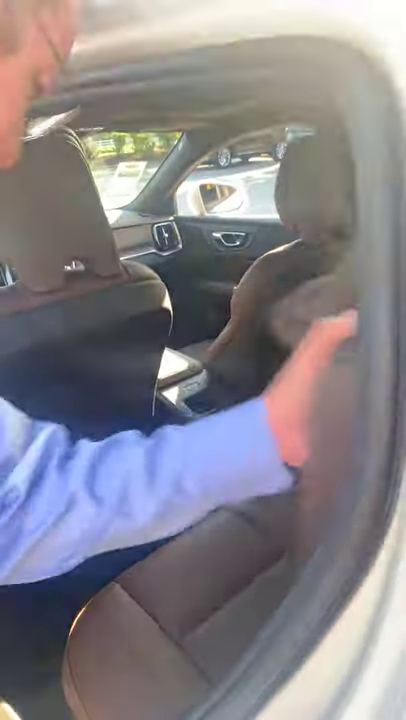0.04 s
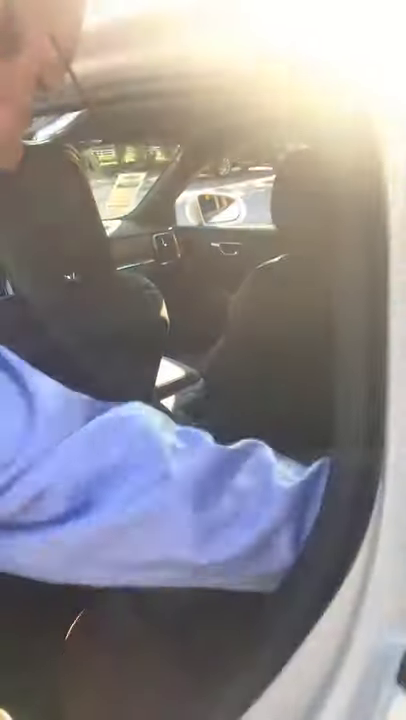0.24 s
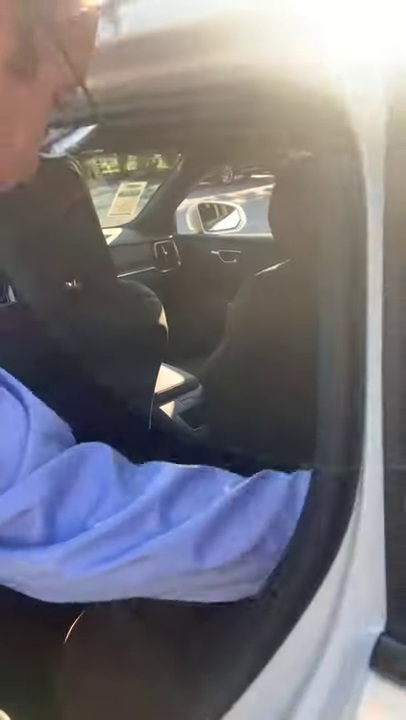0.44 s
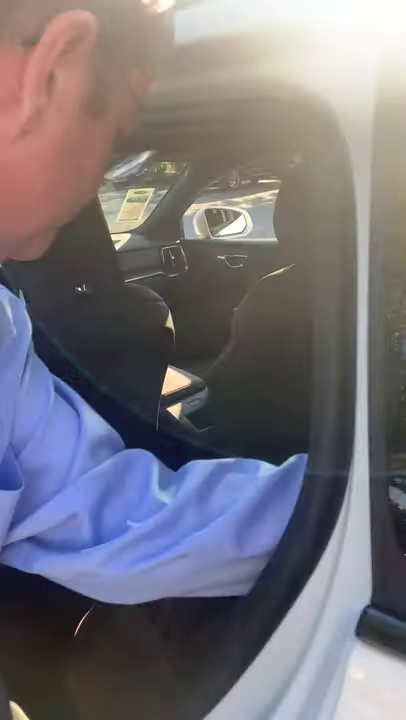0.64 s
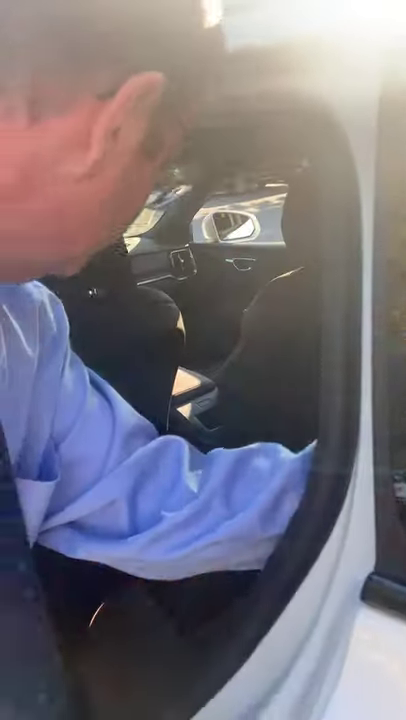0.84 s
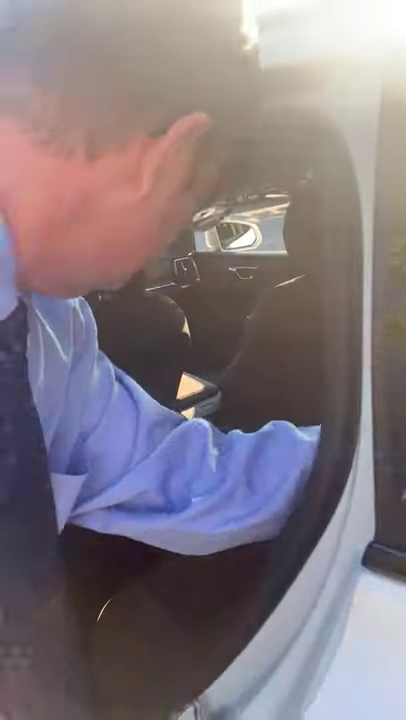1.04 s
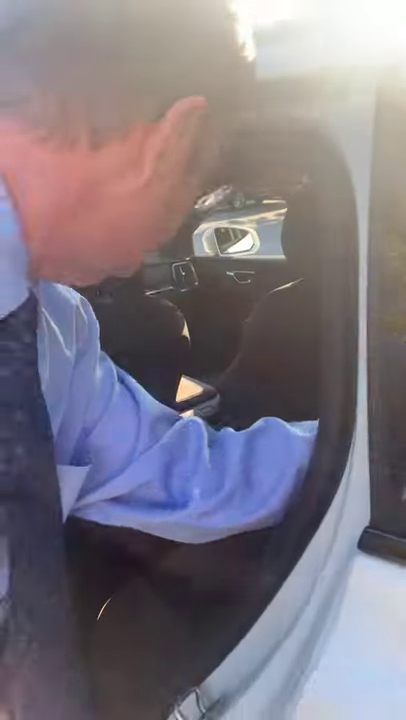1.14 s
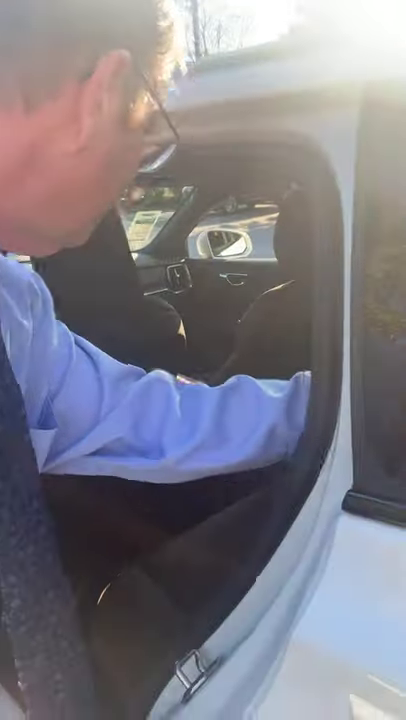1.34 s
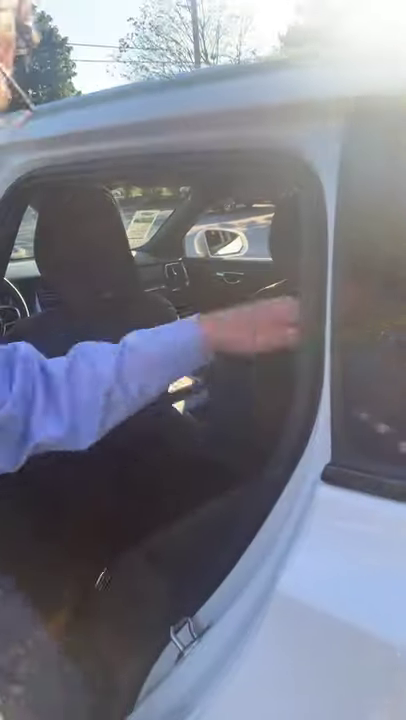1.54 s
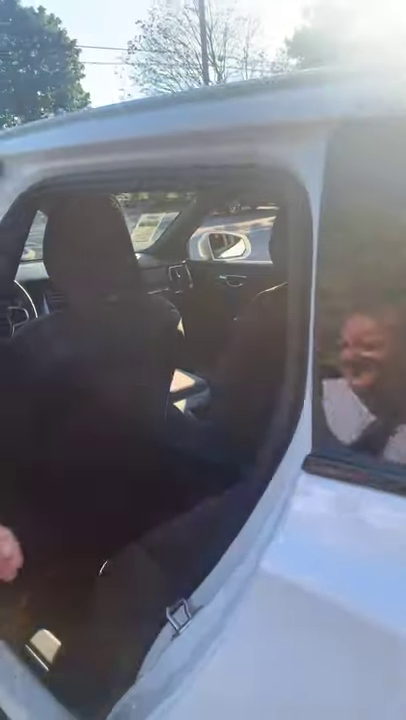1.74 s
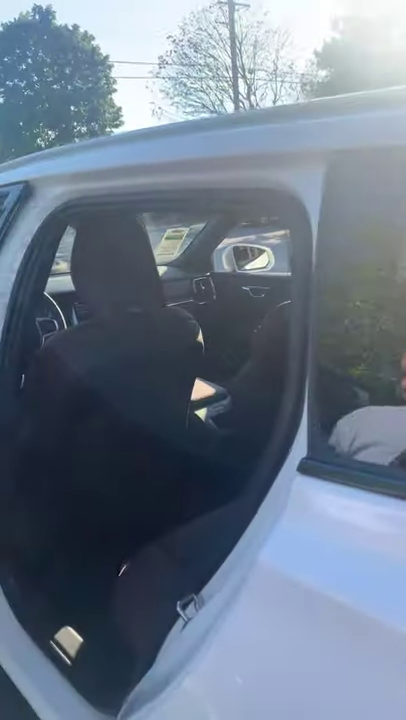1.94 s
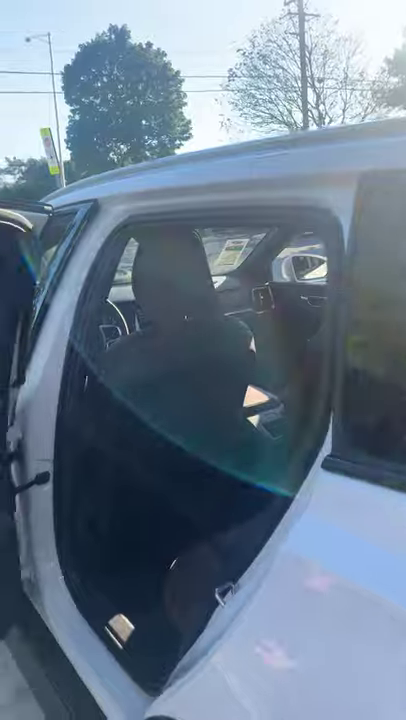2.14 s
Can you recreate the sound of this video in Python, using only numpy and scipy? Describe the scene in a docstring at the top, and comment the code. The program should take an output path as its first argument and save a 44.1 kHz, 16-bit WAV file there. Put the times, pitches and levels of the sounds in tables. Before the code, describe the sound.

A car's rear seat back slams into its latch with a loud thud and brief metallic ring. A softer knock follows, then light sleeve brushes, heard close at the open door over faint engine idle, wind and traffic.

```python
"""A hard slam and a short metallic ring: a car's rear seat back swings upright into its latch,
heard from the open door. The blows shake the panels and frame, the cabin air booms, and the seat
rebounds on its padding; later it is pushed home with a softer knock. Upholstery slides and a sleeve
brushes the trim, over a bed of idling engine, wind and far traffic."""
import sys
import numpy as np
from scipy import signal
from scipy.fft import rfft, irfft, next_fast_len
from scipy.io import wavfile
from scipy.ndimage import uniform_filter1d, minimum_filter1d, map_coordinates

SR = 44100
rng = np.random.default_rng(int(sys.argv[2]) if len(sys.argv) > 2 else 0)


def unload_audio(sound):
    """Save the sound as a 16-bit wav file, at the path given as the first command line argument."""
    columns = np.transpose(np.atleast_2d(sound))
    # keep every value between -1 and 1, then stretch to whole-number steps
    steps = np.round(np.clip(columns, -1, 1) * 32767)
    wavfile.write(sys.argv[1], SR, steps.astype(np.int16))


N = 97020
TIME = np.arange(N) / SR


def slam():
    """The frame hits its stop in a burst of contacts: it rings, panels shake, metal cracks, the pawl snaps."""
    # frame hitting stop and latch (time [s], relative panel level [dB], crack level [dB])
    strikes = [(0.2054, -11.5, -31.5), (0.2094, -7.5, -26.5), (.2183, -20.5, -22.5), (0.225, -20, -25),
               (0.2319, -10, -22), (0.2415, -10, -26), (0.2478, -25, -27.5)]
    # ringing modes of the seat frame (frequency [Hz], relative level [dB], t60 [s])
    frame_modes = [(121.3, -16, 0.13), (214, -10, .2), (295, -3.5, 0.092), (325, -0.5, 0.055),
                   (407, -11, 0.3), (462.8, -5, 0.066), (562.7, -12, 0.16), (660, -20.5, 0.39),
                   (736.5, -14, 0.35), (881, -22, 0.16), (1016, -10, 0.038), (1093, -9, 0.055),
                   (1682, -26, 0.13), (2540, -35, 0.082)]
    # body of the shaken panels (frequency [Hz], relative level [dB])
    panel_colour = [(40, -34), (110, -20), (200, -12.5), (330, 3), (600, -4), (1200, -9), (1600, -14),
                    (3000, -24.5), (6000, -47), (15000, -67)]
    # bite of metal on metal (frequency [Hz], relative level [dB])
    crack_colour = [(300, -38), (1100, -5.5), (2300, -1.5), (3800, -6.5), (5500, -17.5), (7200, -27),
                    (8300, -25.5), (15000, -53)]
    # latch pawl snapping shut (time [s], level [dB])
    snaps = [(.2275, -25), (0.2317, -24), (.2343, -20.5), (0.2433, -32)]
    # bright click of the pawl (frequency [Hz], relative level [dB])
    pawl_colour = [(500, -35), (3400, 0), (6000, -4), (8500, -11), (15000, -22)]
    frame_db, frame_attack_s, frame_hold_s = -13.5, 0.0036, 0.038
    panel_db = -2.5
    plate_s, plate_hz, plate_db = 0.2118, 1162, -6

    age = np.maximum(TIME - strikes[0][0], 0)
    release = np.maximum(age - frame_hold_s, 0)  # the ring sustains through the burst, then decays
    ring = sum(amp(db) * np.exp(-np.log(1000) * release / t60) * np.sin(2 * np.pi * hz * age)
               for hz, db, t60 in frame_modes)
    out = amp(frame_db) * (1 - np.exp(-age / frame_attack_s)) * ring
    for start, db, crack_db in strikes:
        out += amp(db + panel_db) * fade(start, t60=0.11) * noise(panel_colour)
        out += amp(crack_db) * fade(start, t60=0.053) * noise(crack_colour)
    catch_plate = np.sin(2 * np.pi * plate_hz * (TIME - plate_s))
    out += amp(plate_db) * fade(plate_s, t60=0.03) * catch_plate  # one pitched clack
    for start, db in snaps:
        out += amp(db) * fade(start, t60=0.0037, attack=0.0002) * noise(pawl_colour)
    return out


def thumps():
    """Each padded contact is one low pressure pulse with a dull rattle of trim."""
    # seat bumping its catch (time [s], pulse level [dB], pulse pitch [Hz], rattle level [dB])
    bumps = [(0.2669, -7.5, 352, -30), (.2828, -15, 600, -20.5), (0.2868, -6.5, 314, -23),
             (0.3034, -20.5, 210, -27), (.3300, -22, 450, -33), (0.342, -10.5, 274, -23.5),
             (0.3854, -28, 204, -38), (1.0570, -17, 360, -22.5), (1.0686, -19, 300, -23.5),
             (1.08, -20.5, 260, -56), (1.0956, -19.5, 260, -31)]
    # dull rattle of the trim (frequency [Hz], relative level [dB])
    trim_colour = [(30, -27), (90, -6), (180, -1.5), (380, 0.5), (700, -8), (1400, -18.5), (3000, -34),
                   (7000, -51.5), (15000, -64)]
    out = np.zeros(N)
    for centre, pulse_db, hz, rattle_db in bumps:
        spread = (np.pi * hz * (TIME - centre)) ** 2
        pulse = (2 * spread - 1) * np.exp(-spread)
        rattle = fade(centre - 0.5 / hz, t60=0.11) * noise(trim_colour)
        out += amp(pulse_db) * pulse + amp(rattle_db) * rattle
    return out


def boom():
    """The cabin air and seat springs swell and fade, adding low weight to the slam and the knock."""
    # air and spring resonances (time [s], frequency [Hz], level [dB], rise [s], t60 [s])
    resonances = [(0.233, 28.5, -26.5, 0.019, 0.66), (0.239, 150, -17, 0.0064, 0.36),
                  (1.054, 79.5, -21, 0.0067, .16), (1.07, 157, -28, 0.012, 0.27)]
    return sum(amp(db) * fade(start, t60, rise) * np.sin(2 * np.pi * hz * (TIME - start))
               for start, hz, db, rise, t60 in resonances)


def cabin(sound):
    """The short, padded reverb of the cabin, its treble soaked up by the upholstery."""
    dull_noise = noise([(100, 0), (3500, 0), (15000, -10)])
    tail = (dull_noise * fade(0.0014, t60=0.35))[:SR // 2]
    return signal.fftconvolve(sound, tail / np.linalg.norm(tail))[:N]


def handling():
    """Upholstery slides with a fluttering hiss; sleeve and belt tap the trim in small noise bursts."""
    # upholstery sliding as the seat swings (time [s], level [dB])
    rustle = [(0, -62), (.06, -53.5), (.12, -59), (.19, -46), (.3, -70), (.45, -74)]
    # cloth friction (frequency [Hz], relative level [dB])
    cloth_colour = [(500, 18), (2000, 4), (5500, -2), (9000, -14), (15000, -18)]
    # sleeve and belt touching the trim (time [s], level [dB], centre [Hz], t60 [s])
    touches = [(1.0542, -36, 1310, .035), (1.0542, -46.5, 4800, 0.021), (1.515, -42.5, 54.7, 0.092),
               (1.52, -48, 5760, .02), (1.530, -57, 6000, .05), (1.562, -47, 4700, 0.021),
               (1.727, -52, 3350, 0.099), (1.758, -38, 416, 0.1)]
    out = amp(curves(rustle)[0] + 4.5 * wobble(38.3)) * noise(cloth_colour)
    for start, db, hz, t60 in touches:
        band = [(hz * 2.0 ** octave, -15 * octave ** 2) for octave in range(-4, 5)]
        out += amp(db) * fade(start, t60) * noise(band)
    return out


def engine():
    """An idling engine's low hum with two overtones, slightly unsteady in pitch and level."""
    # hum as the listener moves by the door (time [s], harmonic 1 [dB], harmonic 2 [dB], harmonic 3 [dB])
    harmonic_levels = [(0, -71, -47.5, -53), (.2, -56, -51, -43.5), (.5, -49, -54.5, -49.5),
                       (.62, -48.5, -56, -60), (.9, -48, -61, -53), (1.28, -44, -56, -49.5),
                       (1.52, -57.5, -57.5, -55.5), (1.8, -45.5, -63.5, -63), (2.2, -60, -69, -85)]
    hum_hz, waver = 87, 0.0077
    pitch = hum_hz * (1 + waver * wobble(8.09))
    phase = 2 * np.pi * np.cumsum(pitch) / SR
    return sum(np.sqrt(2) * amp(db + 0.4 * wobble(11.8)) * np.sin(harmonic * phase)
               for harmonic, db in enumerate(curves(harmonic_levels), 1))


def outdoors():
    """Wind rushes steadily while the tyre roar of far traffic grows."""
    # low rush of wind (frequency [Hz], relative level [dB])
    wind_colour = [(12, -46), (20, -27), (38, -4.5), (53, -32), (66, -17), (83, -2.5), (101, -18.5),
                   (116, -7.5), (161, -16.5), (232, -12), (259, -11.5), (505, -14.5), (932, -11.5),
                   (1160, -18.5), (1540, -21), (5850, -46.5), (15500, -57.5)]
    # distant tyre roar (frequency [Hz], relative level [dB])
    tyre_colour = [(100, -31), (300, -11), (420, -6.5), (600, -10.5), (780, -0.5), (910, 1), (1100, -4),
                   (1500, -7.5), (2600, -19), (5000, -35), (15000, -67)]
    # slow swell of the traffic (time [s], level [dB])
    traffic_swell = [(0, -49.5), (.5, -48.5), (1.0, -49), (1.4, -48), (1.65, -44), (2.2, -43)]
    wind_db = -43
    wind = amp(wind_db + 0.2 * wobble(13.34)) * noise(wind_colour)
    traffic = amp(curves(traffic_swell)[0] + 1.25 * wobble(6.94)) * noise(tyre_colour)
    return wind + traffic


def amp(db):
    """Decibels to linear gain."""
    return 10 ** (np.asarray(db) / 20)


def curves(rows):
    """One automation curve for each column after the time."""
    times, *columns = np.transpose(rows)
    return [np.interp(TIME, times, column) for column in columns]


def wobble(rate):
    """A smooth random curve, rate knots a second."""
    return map_coordinates(rng.standard_normal(200), [TIME * rate], mode="mirror")


def noise(colour):
    """Noise of rms 1, shaped by rows of (frequency [Hz], relative level [dB])."""
    hz, db = np.transpose(colour)
    size = next_fast_len(N + 8192)
    gain = amp(np.interp(np.log(np.fft.rfftfreq(size, 1 / SR) + 1), np.log(hz), db))
    shaped = irfft(rfft(rng.standard_normal(size)) * gain, size)[:N]
    return shaped / np.sqrt(np.mean(shaped ** 2) + 1e-20)


def fade(start, t60, attack=0.00034):
    """Percussive envelope: a quick rise at start, then an exponential decay (times in seconds)."""
    age = np.maximum(TIME - start, 0)
    return (1 - np.exp(-age / attack)) * np.exp(-np.log(1000) * age / t60)


def scene():
    """Mono mix: the seat's hits and their reverb in front, then boom, cloth and the background bed."""
    reverb_db = -21
    seat = slam() + thumps()
    return (seat + amp(reverb_db) * cabin(seat) + boom() + handling() + engine() + outdoors())[None]


def record(dry):
    """A fast limiter holds down the highest peaks, then a steep low-pass cuts the very top."""
    ceiling_db, hold_s, top_hz = -3, 0.0024, 15750
    width = int(hold_s * SR)
    needed_gain = np.minimum(1, amp(ceiling_db) / (np.abs(dry) + 1e-9))
    limited = dry * uniform_filter1d(minimum_filter1d(needed_gain, width), width)
    size = next_fast_len(N + 8192)
    passband = np.fft.rfftfreq(size, 1 / SR) < top_hz
    return irfft(rfft(limited, size) * passband, size)[..., :N]


dry = scene()
out = record(dry)
unload_audio(out)
```